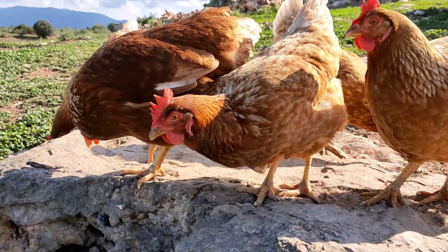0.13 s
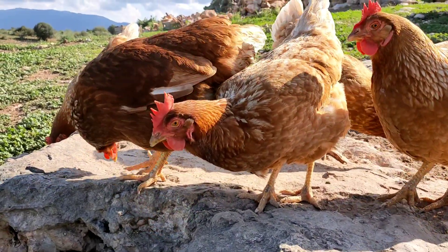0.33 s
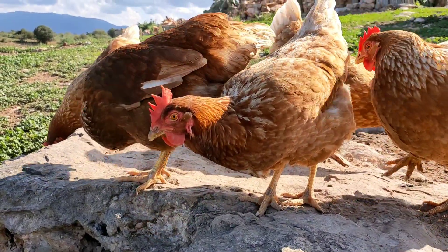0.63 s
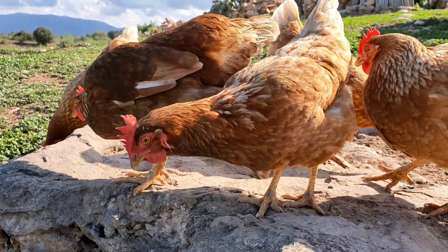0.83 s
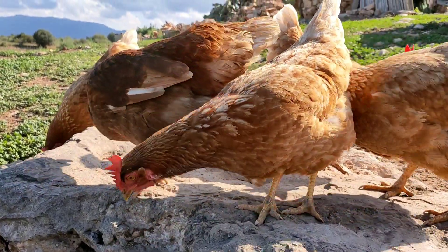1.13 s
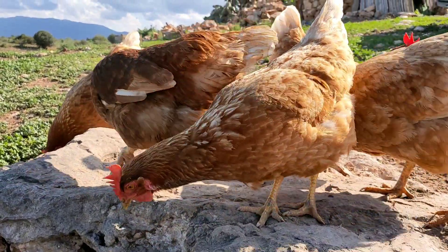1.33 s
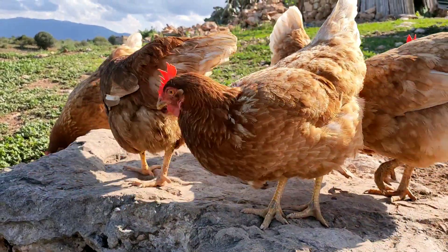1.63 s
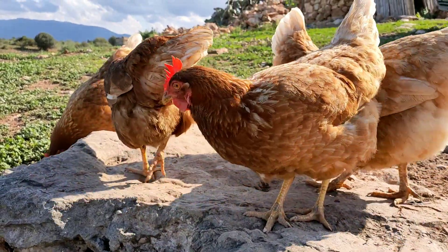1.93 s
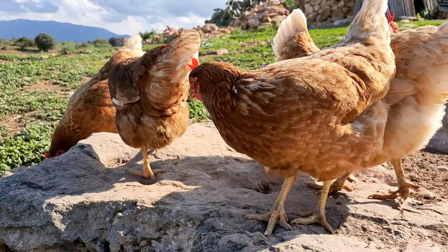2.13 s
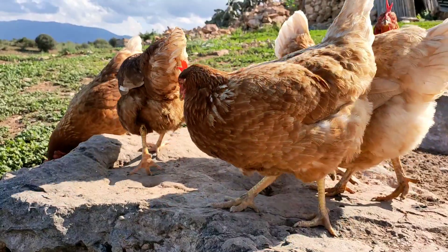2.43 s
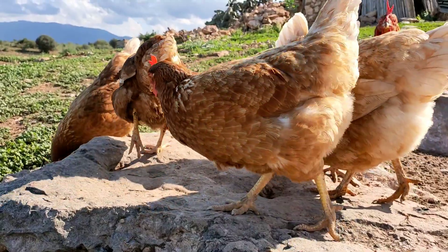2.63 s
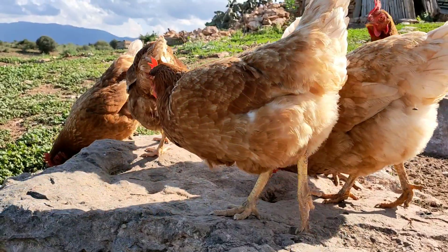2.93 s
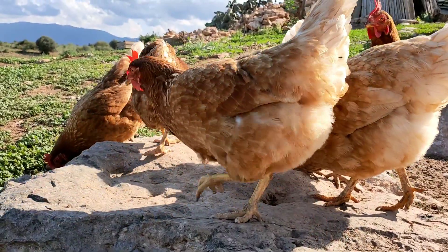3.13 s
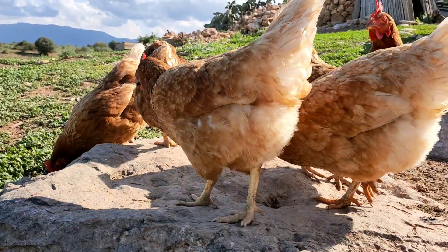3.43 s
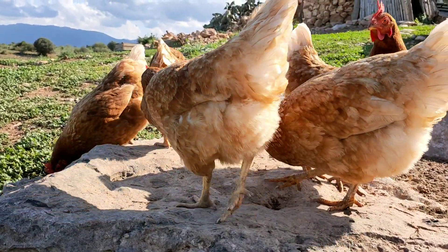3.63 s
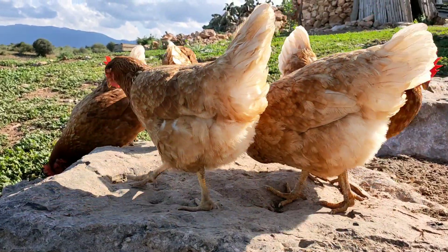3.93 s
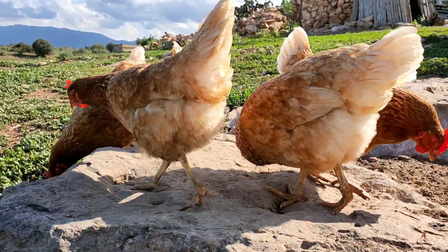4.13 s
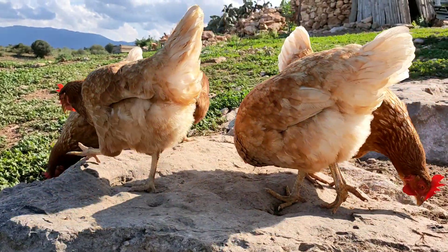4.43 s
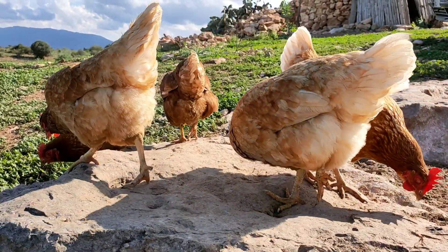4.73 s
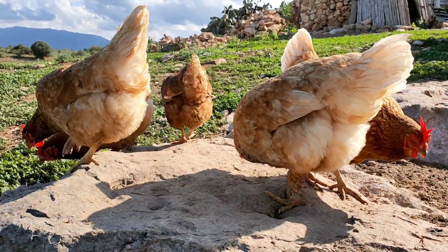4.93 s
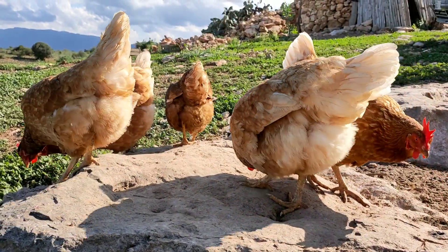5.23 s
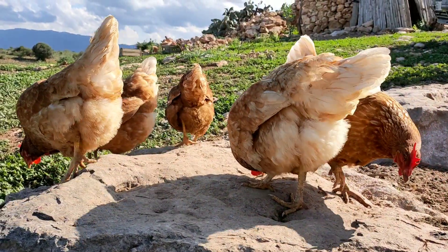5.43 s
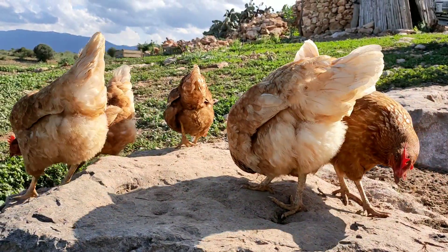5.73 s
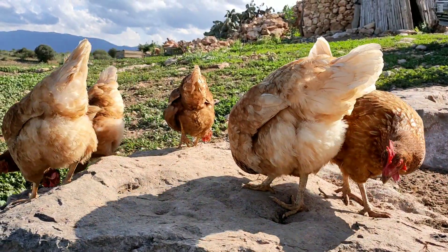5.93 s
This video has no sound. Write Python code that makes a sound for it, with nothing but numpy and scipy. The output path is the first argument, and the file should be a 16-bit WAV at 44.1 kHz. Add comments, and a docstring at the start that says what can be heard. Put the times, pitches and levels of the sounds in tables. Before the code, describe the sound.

A soft knock and a couple of quiet clucks lead into a hen's long, wavering whines near the microphone. Other hens overlap with a squeal, yelps and gentle coos, then fall quiet until one last cluck. Claws tick lightly on rock now and then. Small birds chirp farther off in the field, over a faint outdoor hiss and low rumbles of wind on the microphone.

```python
"""A rock in an open field, hens foraging close by. One draws out long wavering whines; others cut in with a
squeal, yelps and soft coos, and the voices beat against each other. Each whine, squeal and yelp is a trembling
tone whose octave blooms at the throat resonance; the coos are almost pure notes. Short clucks, claws on stone,
soft knocks, a footfall. Small birds chirp farther off over a faint outdoor hiss; a light breeze rumbles on the
microphone."""
import sys
import numpy as np
from scipy import signal
from scipy.fft import rfft, irfft, next_fast_len
from scipy.io import wavfile
from scipy.ndimage import map_coordinates

SR = 44100
rng = np.random.default_rng(int(sys.argv[2]) if len(sys.argv) > 2 else 0)


def inscribe(sig):
    """Save sig as 16-bit PCM at rate SR to the path in sys.argv[1].

    A 1-D sig is mono; a 2-D sig holds one channel per row.
    Samples are clipped to [-1, 1] before scaling.
    """
    pcm = np.round(np.clip(np.atleast_2d(sig).T, -1, 1) * 32767)
    wavfile.write(sys.argv[1], SR, pcm.astype(np.int16))


N = 267687
TIME_S = np.arange(N) / SR
LAG_S_PER_DB = 4.5e-5


def amp(db):
    """Decibels to gain."""
    return 10 ** (np.asarray(db) / 20)


def unit(x):
    """Scale to rms 1."""
    return x / np.sqrt(np.mean(x ** 2) + 1e-20)


def along(points, hz):
    """Interpolate (freq_hz, value) points on a log axis."""
    freq_hz, values = np.transpose(points)
    return np.interp(np.log(hz + 1), np.log(freq_hz + 1), values)


def curves(rows, t=TIME_S):
    """Interpolate each column after the first at times t."""
    time_s, *columns = np.transpose(rows)
    return [np.interp(t, time_s, column) for column in columns]


def wobble(rate_hz, size=N):
    """Smooth random curve, rate_hz knots a second."""
    knots = rng.standard_normal(int(size * rate_hz / SR) + 4)
    return map_coordinates(knots, [np.arange(size) * rate_hz / SR])


def resonance(hz, centre_hz, width_hz=110):
    """Flat-topped, steep-sided peak; the default width is a hen's throat."""
    return 1 / (1 + ((hz - centre_hz) / width_hz) ** 4)


def filtered(x, response):
    """Apply a frequency response."""
    size = next_fast_len(N + SR // 4)
    return irfft(rfft(x, size) * response(np.fft.rfftfreq(size, 1 / SR)), size)[..., :N]


def add(track, start_s, sound):
    """Mix a sound into a track."""
    start = max(round(start_s * SR), 0)
    part = track[..., start:start + sound.shape[-1]]
    part += sound[..., :part.shape[-1]]


def pan(x, left_db, lag_s_per_db=0):
    """The nearer microphone hears a sound louder and, given a lag, earlier."""
    half_db = np.array([[left_db], [-left_db]]) / 2
    return filtered(x, lambda hz: amp(half_db) * np.exp(2j * np.pi * hz * lag_s_per_db * half_db))


# left-right likeness: freq_hz, correlation
COHERENCE = [(150, 1), (600, 0.24), (6000, 0.73), (9000, 0.32)]

def noise(spectrum):
    """Stereo noise of rms 1, near mono in the bass, wider above."""
    def mid_side(hz):
        angle = np.arccos(np.clip(along(COHERENCE, hz), -1, .9995)) / 2
        return amp(along(spectrum, hz)) * [np.cos(angle), np.sin(angle)]
    mid, side = filtered(rng.standard_normal((2, N)), mid_side)
    return unit(np.array([mid + side, mid - side]))


# draught between gusts: time_s, level_db
DRAUGHT = [(0, -69), (1.1, -82), (2, -69), (4, -71), (4.55, -80.5), (6, -77)]
# gusts: peak_s, level_db, decay_db_per_s
GUSTS = [(.025, -44, 237), (1.409, -51, 119), (1.598, -51.5, 49), (2.48, -56.5, 111), (3.39, -60.5, 120),
         (4.109, -60, 156), (5.44, -64, 42.5)]
# wind rumble: freq_hz, gain_db
RUMBLE_SPECTRUM = [(20, -9), (52, 4.5), (110, -10), (400, -53)]

def breeze(rise_db_per_s=398):
    """Gusts buffet the microphone, rising fast and dying away over a weak draught."""
    draught_db, = curves(DRAUGHT)
    power = amp(draught_db) ** 2
    for peak_s, level_db, decay_db_per_s in GUSTS:
        t = TIME_S - peak_s
        power += amp(level_db - np.maximum(-rise_db_per_s * t, decay_db_per_s * t)) ** 2
    return np.sqrt(power) * amp(2 * wobble(25)) * noise(RUMBLE_SPECTRUM)


# field rush, field hiss, microphone noise: freq_hz, gain_db
RUSH_SPECTRUM = [(120, -6.5), (550, -3.5), (1400, -6), (2400, -11), (5000, -40)]
HISS_SPECTRUM = [(1500, -13), (2500, -3.5), (4400, -2.5), (5800, 3.5), (6600, -4), (9500, -21.5)]
MIC_SPECTRUM = [(3000, -24.5), (13000, 0)]

def air():
    """The field's low rush and flickering hiss, plus microphone self-noise."""
    rush = amp(-76 + .51 * wobble(2.7)) * noise(RUSH_SPECTRUM)
    hiss = amp(-74 + 1.85 * wobble(13)) * noise(HISS_SPECTRUM)
    return rush + hiss + amp(-79.5) * noise(MIC_SPECTRUM)


def far_flock(level_db=-75, count=150):
    """Faint chirps from across the field, mostly low and falling."""
    track = np.zeros(N)
    for when, pitch, span, glide, distance in rng.random((count, 5)):
        length_s = .02 * (1 + 2.5 * span)
        u = np.linspace(0, 1, int(length_s * SR))
        start_hz = 2000 * 2.8 ** (pitch ** 1.6)
        hz = start_hz * (1 + .5 * (glide - .65) * u + .015 * wobble(300, len(u)))
        swell = amp(level_db - 10 * distance) * np.sin(np.pi * u)
        add(track, when * N / SR, swell * np.sin(2 * np.pi * np.cumsum(hz) / SR))
    return track


# soft knocks: peak_s, pitch_hz, width_s, level_db
KNOCKS = [(.02, 670, 0.00091, -31.5), (0.022, 479, 0.0085, -45)]

def knocks(cutoff_hz=1400):
    """Brief dull bumps close by."""
    track = np.zeros(N)
    for peak_s, pitch_hz, width_s, level_db in KNOCKS:
        t = TIME_S - peak_s
        track += amp(level_db) * np.exp(-np.abs(t) / width_s) * np.cos(2 * np.pi * pitch_hz * t)
    return filtered(track, lambda hz: 1 / (1 + (hz / cutoff_hz) ** 8))


# claw and beak taps: start_s, relative_db
TAPS = [(0.202, -56), (0.977, -58), (1.6334, -54.5), (2.802, -44), (2.8152, -47.5), (2.829, -45),
        (4.9247, -52), (5.1934, -56), (5.207, -52), (5.2173, -56), (5.584, -55.5)]
# claw scuffs: start_s, length_s, level_db
SCUFFS = [(0.106, 0.14, -69.5), (1.355, .08, -69), (5.169, 0.14, -69)]
# struck stone: freq_hz, gain_db
STONE_SPECTRUM = [(1500, -1.5), (4000, 5.5), (6200, 10.5), (9000, -6.5), (15000, -16)]

def claws_and_beaks(t60_s=.018, tap_gain_db=-2.5):
    """Sharp dry ticks on the rock and longer, softer gritty scuffs."""
    force = np.zeros(N)
    t = TIME_S[:SR // 8]
    for start_s, relative_db in TAPS:
        add(force, start_s, amp(tap_gain_db + relative_db - 60 * t / t60_s))
    for start_s, length_s, level_db in SCUFFS:
        size = int(length_s * SR)
        add(force, start_s, amp(level_db + 4.5 * wobble(400, size)) * np.hanning(size))
    return force * noise(STONE_SPECTRUM)


def voice(t, hz, level_db, octave_db, jitter, shimmer_db, third_db, edge_s):
    """Trembling fundamental, octave and weak overtones; third_db is relative to the octave."""
    phase = 2 * np.pi * np.cumsum(hz * (1 + jitter * wobble(130.1, len(t)))) / SR
    overtones = sum(amp(third_db - 9.5 * (k - 3)) * np.sin(k * phase) for k in range(3, 7))
    tone = np.sin(phase) + amp(octave_db) * (np.sin(2 * phase) + overtones)
    ramp = np.clip(np.minimum(t - t[0], t[-1] - t) / edge_s, 0, 1)
    gate = np.sin(np.pi / 2 * ramp) ** 2
    tremble = wobble(110.6, len(t)) + .19 * wobble(420, len(t))  # with cycle-to-cycle grain
    track = np.zeros(N)
    add(track, t[0], np.sqrt(2) * tone * gate * amp(level_db + shimmer_db * tremble))
    return track


THROAT_HZ = 1037

def call(rows, beak_db, jitter, shimmer_db, third_db, throat_hz=THROAT_HZ, dulling_db=0, unrest=0):
    """A nearly closed beak passes only low harmonics; the octave blooms at the throat resonance."""
    edge_s = .00725
    t = np.arange(rows[0][0] - edge_s / 2, rows[-1][0] + edge_s / 2, 1 / SR)
    hz, effort_db = curves(rows, t)
    lift_db = np.interp(t, TIME_S, np.broadcast_to(beak_db, N))
    centre_hz = np.interp(t, TIME_S, np.broadcast_to(throat_hz, N))
    octave_db = -6.5 - 17.5 * np.log2(2 * hz / THROAT_HZ) + lift_db * resonance(2 * hz, centre_hz)
    waver = (hz / hz.min()) ** unrest  # less steady as she strains higher
    dulled_db = third_db - dulling_db * np.linspace(0, 1, len(t))
    return voice(t, hz, effort_db, octave_db, jitter * waver, shimmer_db * waver, dulled_db, edge_s)


# whines: time_s, pitch_hz, effort_db
FAINT_WHINE = [(0.17, 491, -69.5), (0.425, 480, -77)]
RISING_WHINE = [(1.025, 546, -56), (1.053, 504.4, -46), (1.17, 502, -47), (1.273, 529, -46),
                (1.306, 590, -47.5), (1.356, 569, -45.5), (1.451, 601, -42), (1.493, 696, -46.5),
                (1.539, 719, -46.5), (1.613, 784, -42.5)]
LONG_WHINE = [(1.688, 474.5, -58), (1.715, 460, -49.5), (1.845, 446.4, -53.5), (1.868, 429, -64.5),
              (1.902, 445, -62), (1.918, 481, -51.5), (1.975, 499, -48), (1.987, 468.5, -52.5),
              (2.095, 578.6, -47.5), (2.128, 510.5, -53), (2.18, 509.2, -50.5), (2.2, 491.4, -54.5),
              (2.228, 528, -58), (2.26, 512.5, -54), (2.4, 509.7, -56), (2.425, 575, -54),
              (2.53, 593.4, -55.5), (2.548, 487, -63)]
FALLING_WHINE = [(2.724, 535, -54.5), (2.749, 526, -51.5), (2.79, 536, -58.5), (2.813, 513, -59),
                 (2.848, 546, -50), (2.872, 517.6, -52.5), (2.91, 573, -56), (2.942, 517, -54.5),
                 (3.005, 493.6, -51.5), (3.033, 434, -57.5)]
# beak opening: time_s, resonance_lift_db
BEAK_OPENING = [(.3, -14.5), (1.09, -1.5), (1.18, 12.5), (1.21, 1), (1.8, 6), (2.2, 12), (2.75, 17.5),
                (3.0, 6.5)]
# throat resonance as she reshapes it: time_s, centre_hz
THROAT_TUNING = [(1.55, 1019), (1.8, 875), (2.05, 990)]
# strained throat: freq_hz, gain_db
RASP_SPECTRUM = [(1500, -27.5), (2700, -7.5), (3700, 5), (9000, -25)]

def whining_hen():
    """Two whines, smooth until the pitch rises, then two shaky, raspy ones slightly left."""
    beak_db, = curves(BEAK_OPENING)
    throat_hz, = curves(THROAT_TUNING)
    smooth = sum(call(rows, beak_db, jitter=.004, shimmer_db=.4, third_db=-31, throat_hz=throat_hz,
                      unrest=4) for rows in (FAINT_WHINE, RISING_WHINE))
    shaky = sum(call(rows, beak_db, jitter=.018, shimmer_db=1.72, third_db=-29.5, throat_hz=throat_hz,
                     dulling_db=10) for rows in (LONG_WHINE, FALLING_WHINE))
    rasp = amp(-28.5) * shaky * noise(RASP_SPECTRUM)
    return smooth + pan(shaky, left_db=2, lag_s_per_db=LAG_S_PER_DB) + rasp


# song shapes by name: length_s, rasp_share, pitches_hz
SONGS = { "peep": (.046, .08, [5500, 6170, 5880]), "churr": (.095, .6, [1950, 2550, 2100]),
         "arch": (.095, .35, [3700, 4650, 4000, 3650]), "chip": (.078, .4, [3150, 3850, 2850]),
         "slide": (.07, .25, [3950, 2650, 2100]), "rise": (.04, .15, [2150, 2620, 2640]),
         "drawl": (.24, .9, [1780, 1560]), "purl": (.24, .5, [2540, 2380]),
         "high note": (.085, .08, [2600, 2620]), "low note": (.085, .08, [2220, 2170]),
         "whistle": (.056, .07, [5000, 4720, 4950]), "tick": (.018, .25, [2850, 2350]),
         "flit": (.018, .45, [6250, 5300]), "buzz": (.08, .7, [5600, 5550]),
         "swoop": (.038, .07, [6900, 5550, 4800]), }
# chirps: start_s, song, level_db
CHIRPS = [(.265, "churr", -74.5), (0.447, "peep", -63.5), (0.525, "slide", -76), (0.653, "peep", -61),
          (.82, "drawl", -69), (.848, "peep", -60), (1.11, "purl", -74), (1.397, "churr", -64.5),
          (1.59, "churr", -73.5), (1.874, "buzz", -63.5), (2.164, "churr", -69), (2.365, "churr", -65),
          (2.58, "chip", -67.5), (2.705, "arch", -61), (2.836, "slide", -61), (2.983, "tick", -70),
          (3.028, "rise", -64), (3.365, "chip", -63.5), (3.631, "chip", -71.5), (3.77, "churr", -77),
          (4.369, "buzz", -72.5), (4.765, "high note", -74.5), (4.94, "low note", -74.5),
          (5.234, "high note", -70), (5.335, "low note", -75), (5.424, "tick", -58), (5.503, "flit", -64.5),
          (5.54, "whistle", -67), (5.611, "tick", -58), (5.66, "whistle", -64), (5.689, "flit", -58),
          (5.72, "flit", -59), (5.804, "tick", -61), (5.901, "swoop", -57), (5.925, "high note", -70)]

def small_birds(flutter_db=5, flutter_hz=109):
    """Fluttering glides through a few pitches; a fast quaver makes some raspy."""
    track = np.zeros(N)
    for start_s, song, level_db in CHIRPS:
        length_s, rasp_share, pitches_hz = SONGS[song]
        u = np.linspace(0, 1, int(length_s * SR))
        position = u * (len(pitches_hz) - 1)
        glide_hz = map_coordinates(np.array(pitches_hz, float), [position], order=2, mode="nearest")
        hz = glide_hz * (1 + .1 * rasp_share * wobble(700, len(u)))
        swell = np.sqrt(np.abs(np.sin(np.pi * u))) * amp(flutter_db * wobble(flutter_hz, len(u)))
        phase = 2 * np.pi * np.cumsum(hz) / SR
        fifth_below = amp(-10) * np.sin(phase * 2 / 3) * (song == "peep")
        add(track, start_s, amp(level_db) * swell * (np.sin(phase) + fifth_below))
    return track


# clucks: start_s, length_s, start_hz, end_hz, level_db
CLUCKS = [(0.597, 0.032, 762, 504, -55), (0.765, 0.016, 804, 560, -61), (5.937, 0.0103, 596, 475, -56),
          (5.968, 0.038, 944, 465, -45)]

def clucks(octave_db=-13):
    """Brief falling notes that swell late, as the octave nears the throat resonance."""
    track = np.zeros(N)
    for start_s, length_s, start_hz, end_hz, level_db in CLUCKS:
        u = np.linspace(0, 1, int(length_s * SR))
        hz = end_hz + (start_hz - end_hz) * (1 - u) ** 2
        phase = 2 * np.pi * np.cumsum(hz) / SR
        octave = amp(octave_db) * resonance(2 * hz, THROAT_HZ) * np.sin(2 * phase)
        add(track, start_s, amp(level_db) * np.sin(np.pi * u ** 1.54) * (np.sin(phase) + octave))
    return track


def yelp(start_s, length_s, start_hz, end_hz, level_db, beak_db, third_db):
    """Pitch climbs while effort builds and holds, then both give way; the tone dulls throughout."""
    attack, release = .22, .82  # shares of the length
    rows = [(start_s, start_hz, level_db - 9),
            (start_s + attack * length_s, start_hz + attack * (end_hz - start_hz), level_db),
            (start_s + release * length_s, end_hz, level_db),
            (start_s + length_s, end_hz - 40, level_db - 10.5)]
    return call(rows, beak_db, jitter=.015, shimmer_db=.97, third_db=third_db, dulling_db=18)


# squeal: time_s, pitch_hz, effort_db
SQUEAL = [(1.718, 495.5, -45), (1.728, 562, -40), (1.741, 649, -43.5), (1.744, 834, -40.5),
          (1.78, 731, -43), (1.789, 826, -40.5), (1.837, 777, -38.5), (1.849, 674, -43.5),
          (1.863, 850, -40.5)]
# yelps: start_s, length_s, start_hz, end_hz, level_db, beak_db, third_db
YELPS = [(1.994, 0.099, 535.7, 628.6, -37.5, 4.5, -14), (2.272, 0.0638, 512.4, 590.3, -38.5, 16, -31)]

def answering_hen():
    """A squeal cracks upward and beats against the whine; of two yelps, the first turns hoarse."""
    squeal = call(SQUEAL, beak_db=5.5, jitter=.026, shimmer_db=1.3, third_db=-22.5)
    hoarse, loud = (yelp(*row) for row in YELPS)
    start_s, length_s = YELPS[0][:2]
    strain = np.clip((TIME_S - start_s) / length_s, 0, 1) ** .5
    # air hisses through the throat in step with the voice's cycles
    rasp = (amp(-22.5) * strain * hoarse + amp(-41) * (squeal + loud)) * noise(RASP_SPECTRUM)
    return pan(squeal + hoarse + loud, left_db=.84, lag_s_per_db=LAG_S_PER_DB) + rasp


def far_trill(start_s=2.298, length_s=.91, level_db=-77, edge_s=.051):
    """A distant high trill, blurred into a narrow band of sizzle."""
    gate = np.clip(np.minimum(TIME_S - start_s, start_s + length_s - TIME_S) / edge_s, 0, 1)
    band = filtered(rng.standard_normal(N), lambda hz: resonance(hz, centre_hz=5430, width_hz=490))
    return gate * amp(level_db + 3.2 * wobble(55)) * unit(band)


def coo(start_s, length_s, start_hz, end_hz, catch_hz, level_db):
    """An almost pure note: it drops from any opening catch, swells, then sags and fades."""
    edge_s, catch_s, release_s = .00694, .0176, .022
    swell_db, fade_db, sag_hz = 6.5, 3.5, 25
    t = np.arange(-edge_s / 2, length_s + edge_s / 2, 1 / SR)
    catch = np.clip(1 - t / catch_s, 0, 1)
    release = np.clip(1 - (length_s - t) / release_s, 0, 1)
    hz = start_hz + (end_hz - start_hz) * t / length_s + catch_hz * catch - sag_hz * release
    effort_db = level_db - swell_db * (1 - t / length_s) - fade_db * release
    return voice(start_s + t, hz, effort_db, octave_db=-27, jitter=.016, shimmer_db=2, third_db=-21,
                 edge_s=edge_s)


# coos: start_s, length_s, start_hz, end_hz, catch_hz, level_db
COOS = [(2.444, 0.24, 620, 654, 0, -52), (2.817, 0.35, 651, 660, 4, -52),
        (3.292, 0.2, 665, 645.6, 178, -48), (3.637, 0.056, 613, 638, 210, -49.5),
        (3.701, 0.053, 690, 660, 5, -55)]

def cooing_hen():
    """Long coos from the right, then a quick pair from ahead."""
    coos = [coo(*row) for row in COOS]
    return pan(sum(coos[:-2]), left_db=-3.5, lag_s_per_db=LAG_S_PER_DB) + sum(coos[-2:])


# foot landing: freq_hz, gain_db
THUD_SPECTRUM = [(70, -7), (170, -3), (320, -17), (700, -27)]

def footfall(start_s=4.888, rise_s=.012, t60_s=.26):
    """A hen steps down off the rock with a dull thud."""
    t = np.maximum(TIME_S - start_s, 0)
    return np.minimum(t / rise_s, 1) * amp(-58 - 60 * t / t60_s) * noise(THUD_SPECTRUM)


def reflections(x, t60_s=.35, delay_s=.012):
    """Diffuse echo off the ground and stone walls."""
    t = TIME_S[:SR // 2]
    tail = rng.standard_normal((2, len(t))) * amp(-60 * t / t60_s) * (t > delay_s)
    return signal.fftconvolve(x, tail / np.linalg.norm(tail[0]), axes=1)[:, :N]


def scene():
    """Near hens almost dry, far birds wetter, all over the moving air."""
    hens = whining_hen() + answering_hen() + cooing_hen() + clucks()
    song = pan(small_birds(), left_db=3.5)
    flock = pan(far_flock() + far_trill(), left_db=2)
    echo = reflections(amp(-17.5) * hens + amp(-6.5) * song + flock)
    return hens + song + flock + echo + knocks() + claws_and_beaks() + footfall() + breeze() + air()


def record(dry, cutoff_hz=15550):
    """Brick-wall low-pass at the camera's band limit."""
    return filtered(dry, lambda hz: hz < cutoff_hz)


dry = scene()
out = record(dry)
inscribe(out)
```